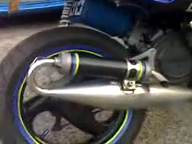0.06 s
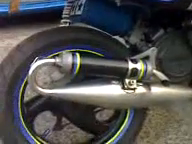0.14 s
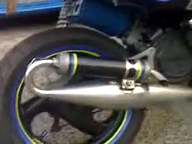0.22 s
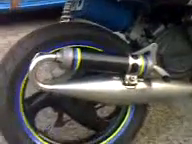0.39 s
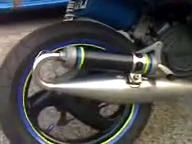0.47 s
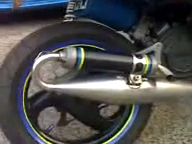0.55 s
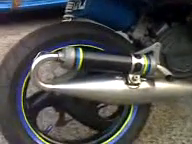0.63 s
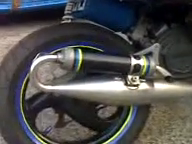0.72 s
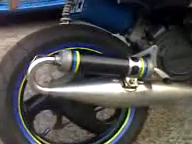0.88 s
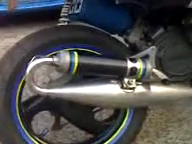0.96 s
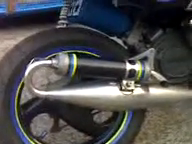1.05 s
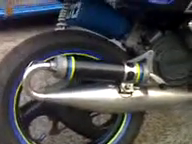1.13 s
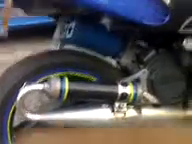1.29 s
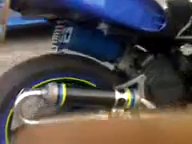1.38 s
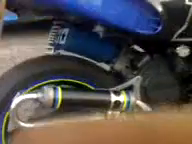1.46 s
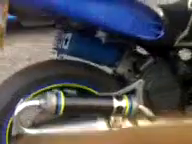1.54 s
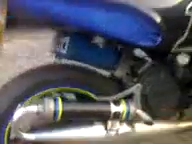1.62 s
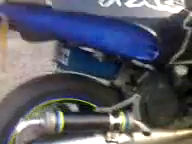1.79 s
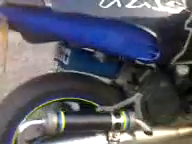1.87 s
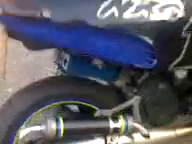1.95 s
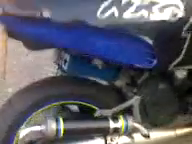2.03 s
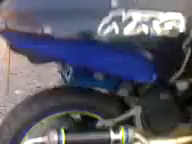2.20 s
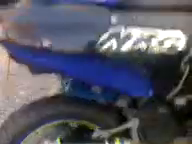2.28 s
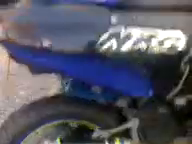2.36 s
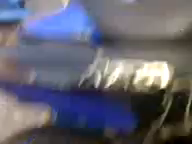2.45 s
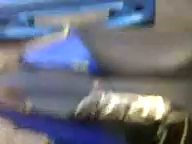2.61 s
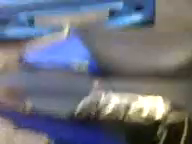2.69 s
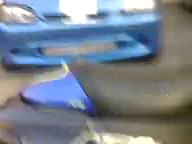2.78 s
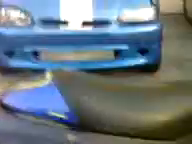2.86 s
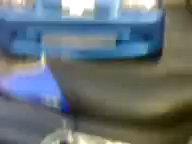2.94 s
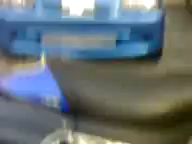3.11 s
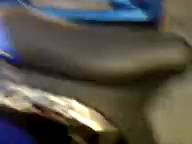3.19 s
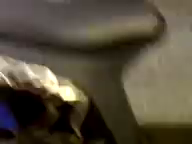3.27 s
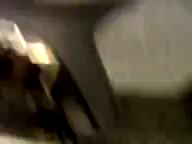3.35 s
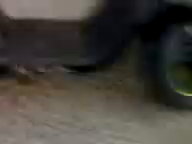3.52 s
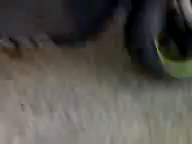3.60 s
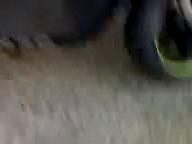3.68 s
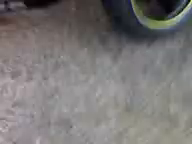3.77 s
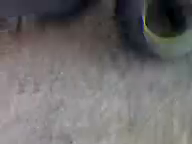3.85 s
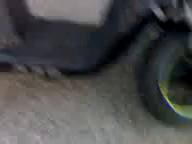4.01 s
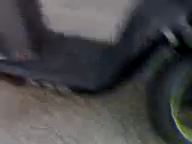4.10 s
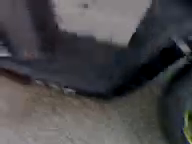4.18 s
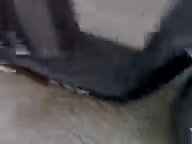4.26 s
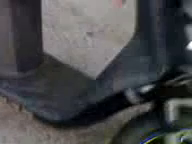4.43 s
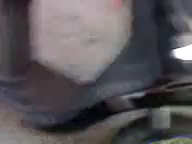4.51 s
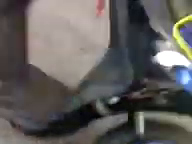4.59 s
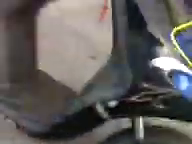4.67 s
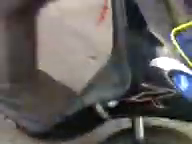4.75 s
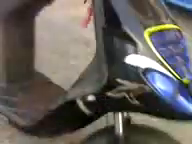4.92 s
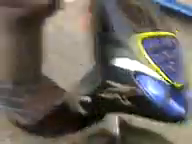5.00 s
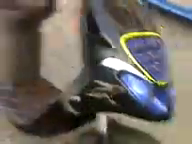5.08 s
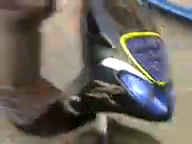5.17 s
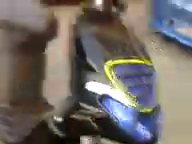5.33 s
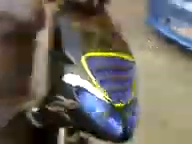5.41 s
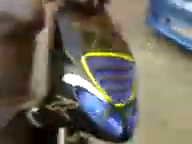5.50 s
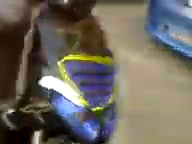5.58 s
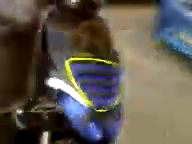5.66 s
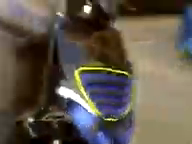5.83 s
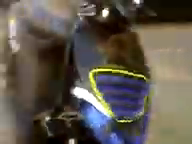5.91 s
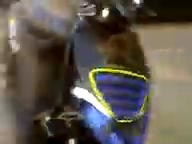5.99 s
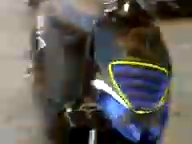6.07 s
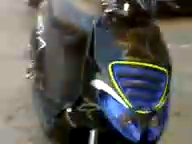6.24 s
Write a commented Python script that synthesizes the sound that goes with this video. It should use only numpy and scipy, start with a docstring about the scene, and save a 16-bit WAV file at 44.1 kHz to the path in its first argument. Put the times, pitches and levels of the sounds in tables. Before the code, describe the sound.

A small two-stroke scooter idles with uneven, hollow exhaust pops and a raspy rattle, growing softer toward the end.

```python
"""In a yard, a small two-stroke scooter idles while the listener walks from its exhaust to the front.
The engine turns about 31 times a second but fires only every third turn, and now and then it stumbles
into weaker, mostly quicker pops. Each pop echoes inside the pipe. Every turn shakes the casing and
chirps at the air intake. A hollow tone glides upward as the body panels pass by, the ground and walls
give a short echo, and three soft, low bumps are heard."""
import sys
import numpy as np
from scipy import signal
from scipy.fft import rfft, irfft, next_fast_len
from scipy.io import wavfile
from scipy.ndimage import uniform_filter1d, map_coordinates

SR = 44100
rng = np.random.default_rng(int(sys.argv[2]) if len(sys.argv) > 2 else 0)


def transcribe(u):
    """Save the signal u as a 16-bit wav file named by the first command-line argument.

    u: samples, shape (n,) or (channels, n), limited to [-1, 1]; the rate is SR.
    q: integer samples, one column per channel.
    """
    v = np.clip(np.atleast_2d(u).T, -1, 1)
    q = np.round(v * 32767).astype(np.int16)
    wavfile.write(sys.argv[1], SR, q)


N = 275625


def amp(db):
    """Turn decibels into a factor to multiply a sound by."""
    return 10 ** (np.asarray(db) / 20)


def unit(x):
    """Scale a signal to an average strength (rms) of 1."""
    return x / np.sqrt(np.mean(x ** 2, axis=-1, keepdims=True) + 1e-20)


def wobble(shape, span):
    """Random wavering: noise averaged over span neighbouring values."""
    return unit(uniform_filter1d(rng.standard_normal(shape), size=span))


def along(points, hz):
    """Read between (frequency, value) points, with octaves evenly spaced."""
    freqs, values = np.transpose(points)
    return np.interp(np.log(hz + 1), np.log(freqs + 1), values)


def curves(rows):
    """Give one value per sample for each column after the time."""
    times, *columns = np.transpose(rows)
    return [np.interp(np.arange(N) / SR, times, column) for column in columns]


def filtered(x, response):
    """Multiply each frequency in x by response(frequency)."""
    size = next_fast_len(N + SR // 2)
    return irfft(rfft(x, size) * response(np.fft.rfftfreq(size, 1 / SR)), size)[:N]


def coloured(x, colour):
    """Shape x with (frequency [Hz], level [dB]) points, then scale it to strength 1."""
    return unit(filtered(x, lambda hz: amp(along(colour, hz))))


def resonate(x, modes):
    """Let x ring at a set of pitches, fading steeply below and above them."""
    def response(f):
        rings = sum((-1) ** k * amp(db) * 1j * f * width / (hz * hz - f * f + 1j * f * width)
                    for k, (hz, width, db) in enumerate(modes))
        below, above = .7 * modes[0][0] / (f + 1), f / (1.3 * modes[-1][0])
        return rings / np.sqrt(1 + below ** 6 + above ** 6)
    return unit(filtered(x, response))


def causal(db):
    """Build a filter with these levels that rings only after a hit (minimum phase)."""
    cepstrum = irfft(np.log(amp(db)))
    half = len(cepstrum) // 2
    return np.exp(rfft(cepstrum * np.r_[1, np.full(half - 1, 2), 1, np.zeros(half - 1)]))


def add(track, s, sound):
    """Mix a sound into the track, starting at s seconds."""
    start = int(np.clip(round(s * SR), 0, N))
    track[start:start + len(sound)] += sound[:N - start]


def spin(start, end, speedup, turn_s):
    """Start times of the whole turns that fill a stretch while the speed grows by a share."""
    count = max(1, round((end - start) / turn_s))
    progress = np.arange(count) / count
    return start + (end - start) * (progress + speedup * progress * (1 - progress) / 2)


def crank(turn_s=.0318, stumble_turn_s=.033, stumble_slows=.07):
    """Time the turns and pops: a steady run fires every third turn, then a stumble slows the engine."""
    # steady runs and their stumbles: (first pop [s], stumble start [s], speed gained [share],
    # weak pop level [dB], weak pop spacing [turns])
    runs = [(0.063, 0.158, 0.055, -2, 2), (0.554, 0.938, 0, -1.5, 2), (1.003, 1.282, 0, -4.5, 2),
            (1.346, 1.922, -.01, -1.5, 2), (2.053, 2.242, .08, -6.5, 2), (2.303, 2.682, 0.061, -3, 2),
            (2.811, 3.194, .01, -2.5, 2), (3.393, 3.966, .08, -3, 2), (4.19, 4.566, 0.06, -.5, 4),
            (4.689, 4.978, -0.046, -5, 2), (5.039, 5.808, .04, -2.5, 2), (5.873, 6.162, .13, -1.5, 3)]
    turns, pops = list(spin(0, runs[0][0], 0, turn_s)), []
    restarts = [run[0] for run in runs[1:]] + [N / SR + turn_s / 2]
    for (first, last, speedup, weak_db, every), restart in zip(runs, restarts):
        steady = spin(first, last, speedup, turn_s)
        stumble = spin(last, restart, -stumble_slows, stumble_turn_s)
        turns += [*steady, *stumble]
        pops += [(s, 0) for s in steady[::3]] + [(s, weak_db) for s in stumble[::every]]
    return np.array(turns), pops


def casing(turns):
    """Piston and transmission shake the casing twice a turn; one thump a turn keeps its hum steady."""
    # noise between the pops: (time [s], low drone [dB], middle churn [dB], high rattle [dB]), all relative
    levels = [(0.0, -30.5, -26.5, -35.5), (0.42, -29, -27.5, -38), (1.2, -30, -27, -38.5),
              (1.92, -31.5, -27.5, -39), (2.31, -32.5, -27, -42), (2.85, -29, -30, -40),
              (3.15, -28.5, -27, -37.5), (3.52, -26.5, -27.5, -44.5), (4.07, -38, -26.5, -41.5),
              (4.67, -31.5, -29, -45.5), (5.01, -34.5, -29, -44.5), (5.85, -34, -34, -46),
              (6.25, -33, -40.5, -51.5)]
    # how casing and panels ring, for drone, churn and hum: (pitch [Hz], width [Hz], level [dB])
    drone_modes = [(164.5, 52, -9.5), (210.4, 37, -9.5), (286.6, 55, -4.5), (327.3, 83, -2.5),
                   (408, 79, -5)]
    churn_modes = [(512.7, 59, 3.5), (680, 240, -6), (780, 120, -4), (1010, 220, -5), (1164, 270, -8),
                   (1320, 140, -8.5)]
    hum_modes = [(198, 11, -2), (283.3, 22, 1.5), (523.3, 44, -7.5)]
    # the hum against the rest of the drone: (time [s], level [dB])
    hum_level = [(0, -0.5), (2, 0), (2.8, -2), (3.7, -5), (5, -3), (5.9, 1.5)]
    # tone colours of the rattle and the deep rumble: (frequency [Hz], level [dB])
    rattle_colour = [(1200, -43.5), (1650, 14), (1900, 1.5), (2300, 1), (2850, -9.5), (3150, -3),
                     (3500, -20), (4300, -20)]
    rumble_colour = [(20, -21), (50, -4), (100, -3), (150, 2.5), (300, -22), (800, -58.5)]
    drone_db, churn_db, rattle_db = curves(levels)
    hum_db, = curves(hum_level)
    angle = 2 * np.pi * np.interp(np.arange(N) / SR, turns, np.arange(len(turns)))

    def shaking(once_db, twice_db, lag):
        """Noise that swells once and twice a turn, lag radians late."""
        swell_db = once_db * np.cos(angle - lag) + twice_db * np.cos(2 * (angle - lag))
        return unit(rng.standard_normal(N) * amp(swell_db))

    thumps = np.zeros(N)
    for s in turns:
        add(thumps, s + .004, np.ones(1))
    hum = amp(hum_db) * resonate(unit(thumps), hum_modes)
    drone = resonate(shaking(once_db=2.5, twice_db=8, lag=1.2), drone_modes)
    churn = resonate(shaking(once_db=-2, twice_db=1, lag=3.6), churn_modes)
    grain = amp(2.5 * wobble(N, span=130))
    rattle = coloured(grain * shaking(once_db=-3, twice_db=-1, lag=1.6), rattle_colour)
    rumble = coloured(rng.standard_normal(N), rumble_colour)
    return (amp(drone_db - 2) * (drone + hum) + amp(churn_db - 1) * churn
            + amp(rattle_db + 4) * rattle + amp((drone_db + rattle_db) / 2 - 10.5) * rumble)


def intake_chirps(turns, pitch_hz=1644, swell_s=.0049, fall_s=.0042, lag_s=.0105, glide=-.018, size=1400):
    """A shrill, raspy chirp each turn, likely from the intake's reed (a thin flap) fluttering."""
    # the usual chirp: (time [s], relative level [dB])
    chirp_level = [(0, -21), (0.301, -16.5), (.75, -19), (2.3, -20), (3, -23.5), (3.25, -19), (3.75, -21.5),
                   (4.05, -30), (5.25, -29), (5.75, -35.5), (6.0, -24.5)]
    # turns that chirp much louder: (time [s], relative level [dB], pitch [Hz])
    loud_chirps = [(0.166, -14.5, 1629), (0.197, -8.5, 1636), (0.263, -10.5, 1636), (0.884, -8, 1634),
                   (0.915, -9, 1650), (1.513, -12, 1565), (1.841, -11.5, 1688), (2.061, -12.5, 1675),
                   (2.252, -11.5, 1625), (2.473, -10.5, 1607), (3.267, -12.5, 1630), (3.879, -19, 1720),
                   (4.136, -17, 1707), (4.673, -21, 1627), (5.213, -17, 1606), (6.083, -19.5, 1675),
                   (6.176, -20.5, 1652)]
    # the airy edge of a chirp: (frequency [Hz], level [dB])
    rasp_colour = [(300, -29.5), (700, 5), (1100, -14), (1400, -5), (1600, 8), (1850, -6), (2300, -18.5),
                   (2800, -15), (3200, -18), (3600, -33), (4300, -44)]
    count = len(turns)
    times = turns + lag_s + .0005 * rng.standard_normal(count)
    levels = np.interp(times, *np.transpose(chirp_level)) + 3.5 * np.minimum(rng.standard_normal(count), 1)
    drift = .011 * wobble(count, span=6)
    pitches = pitch_hz * (1 + drift + .008 * rng.standard_normal(count))
    for s, db, hz in loud_chirps:
        nearest = np.argmin(np.abs(times - s))
        times[nearest], levels[nearest], pitches[nearest] = s, db, hz
    t = (np.arange(size) - size // 2) / SR
    rebound = .18 * np.exp(-((t - .007) / .003) ** 2)
    swell = np.exp(-(t / np.where(t < 0, swell_s, fall_s)) ** 2) + rebound
    tone, air = np.zeros(N), np.zeros(N)
    for s, db, hz in zip(times, levels, pitches):
        flutter, waver = .25 * wobble((2, size), span=90)
        cycles = np.cumsum(hz * (1 + glide * t / swell_s)) / SR + rng.random()
        add(tone, s + t[0], amp(db + 2) * swell * (1 + flutter) * np.sin(2 * np.pi * cycles + waver))
        add(air, s + t[0], amp(db - 7) * swell)
    return tone + air * coloured(rng.standard_normal(N), rasp_colour)


def firings(pops, scatter_db=.5, treble_scatter_db=2):
    """Give each pop its time, level and treble; no two firings are quite alike."""
    # the exhaust as heard along the walk: (time [s], level [dB], treble [dB])
    pop_level = [(0, -17, 3), (1.1, -16.5, -0.5), (1.9, -16.5, 2), (2.4, -16.5, -2), (2.8, -19.5, 5),
                 (3.12, -22, 4.5), (3.45, -17, -4.5), (3.7, -15, -3), (4.4, -17.5, -1), (5.1, -21.5, -5),
                 (5.7, -24, 3), (6.16, -29, 5.5)]
    # the hardest firings: (time [s], extra level [dB], extra treble [dB])
    hard_pops = [(.064, 1.5, -0.5), (.747, 1, 3), (1.097, 2, 1), (1.189, 2, 2.5), (2.052, 1.3, 1)]
    times, strength_db = np.transpose(pops)
    walk_s, walk_db, walk_treble_db = np.transpose(pop_level)
    chance = rng.standard_normal((len(times), 2))
    db = np.interp(times, walk_s, walk_db) + strength_db + scatter_db * chance[:, 0]
    treble_db = np.interp(times, walk_s, walk_treble_db) + treble_scatter_db * chance[:, 1]
    for s, extra_db, extra_treble_db in hard_pops:
        nearest = np.argmin(np.abs(times - s))
        db[nearest] += extra_db
        treble_db[nearest] += extra_treble_db
    return zip(times, db, treble_db)


def exhaust(pops, gas=.14, gas_s=.0078, thinning_db=4, detour=.061, size=4096):
    """Each firing sends a pressure pulse, its echoes in the pipe and a puff of gas out of the silencer."""
    # the walk round the scooter: (time [s], place [0 rear, 1 side, 2 or more front])
    walk = [(0, 0.27), (2.6, 0.52), (3.3, 0.93), (3.9, 1.25), (4.5, 1.57), (5.5, 2.3)]
    # pressure waves leaving the pipe: (base delay [s], rear [gain], side [gain], front [gain])
    pipe_waves = [(.0005, 0.93, 1.5, 0.97), (.0028, 0.63, 0.64, 0.83), (.0049, 0.29, 0.45, 0.88),
                  (.0073, 0.99, 0.39, 0.17), (.0098, 0.97, 0.37, 0.43), (.0121, 0.19, 0.29, 0.19),
                  (.0155, .08, 0.13, 0.43)]
    # a pop's tone colour from behind, beside and in front: (frequency [Hz], level [dB])
    rear = [(60, -23.5), (130, -18.5), (210, -5.5), (420, -17), (680, -5.5), (850, 1.5), (1100, -19.5),
            (1250, -7.5), (1450, -6.5), (1900, -24.5), (2170, -10), (2600, -26), (3200, -31), (4300, -51.5)]
    side = [(60, -27.5), (130, -19), (210, -16.5), (420, -15), (680, 3), (830, -6.5), (1000, -1),
            (1200, -22.5), (1420, -11), (1700, -7.5), (2170, -22.5), (2600, -32), (3200, -35),
            (4300, -60.5)]
    front = [(60, -28.5), (130, -17), (210, -6.5), (420, -22.5), (680, -3.5), (850, -2), (1100, 3.5),
             (1300, -16.5), (1550, -7.5), (1900, -21.5), (2170, -15), (2600, -28), (3200, -33.5),
             (4300, -66.5)]
    # tone colour of the swirling gas: (frequency [Hz], level [dB])
    gas_colour = [(800, -5), (1300, -2.5), (2000, -0.5)]
    out, t, hz = np.zeros(N), np.arange(size) / SR, np.fft.rfftfreq(size, 1 / SR)
    delays, *gains = np.transpose(pipe_waves)
    colours = np.array([along(points, hz) for points in (rear, side, front)])
    # later echoes sound thinner: they have lost more bass through the open tailpipe
    thinning = amp(thinning_db * delays[:, None] / delays[-1] * along([(500, .16), (1200, 1)], hz))
    puff_shape = t / gas_s * np.exp(1 - t / gas_s) * np.exp(-(t / .018) ** 2)
    middle = (hz > 550) & (hz < 1300)
    for s, db, treble_db in firings(pops):
        place = np.clip(np.interp(s, *np.transpose(walk)), 0, 2)
        facing = np.maximum(0, 1 - np.abs(place - np.arange(3)))
        colour = facing @ colours + treble_db * along([(1100, 0), (2100, 1)], hz)
        # gas heat shifts the echoes a little from pop to pop, and their paths change along the walk
        jitter = .007 * rng.standard_normal() + .008 * rng.standard_normal(len(delays))
        arrivals = delays * (1 + jitter + detour * min(place, 1))
        strengths = facing @ np.array(gains) * amp(1.2 * rng.standard_normal(len(delays)))
        pulses = strengths @ (thinning * np.exp(-2j * np.pi * arrivals[:, None] * hz))
        puff = rfft(gas * rng.standard_normal(size) * puff_shape) * amp(along(gas_colour, hz))
        pop = (pulses + puff) * causal(colour)
        # the level is set by the pop's middle frequencies over a fiftieth of a second
        power = 2 * np.sum(np.abs(pop[middle]) ** 2) / size / (SR / 50)
        add(out, s, amp(db) * irfft(pop) / np.sqrt(power))
    return out


def panel_echoes(x, depth):
    """Quick echoes off nearby panels, each flipped in sign, add a hollow tone that moves with the walk."""
    # the hollow tone: (time [s], lowest ringing pitch [Hz], relative echo strength [0-1])
    hollow_tone = [(0, 212, 0.3), (1.2, 215.8, 0.49), (1.9, 187.3, 0), (2.5, 311.5, 0.5), (3, 358.5, .55),
                   (3.3, 455, 0.4), (3.55, 524, 0.56), (3.9, 610, .35), (4.2, 756, 0.2), (4.6, 1063, 0.1),
                   (5.4, 988, 0.07), (6.25, 1240, 0)]
    hz, reflection = curves(hollow_tone)
    gain = np.clip(depth * reflection, 0, .8)
    lag = SR / (2 * hz)
    echoes = sum((-gain) ** k * map_coordinates(x, [np.arange(N) - k * lag], order=1) for k in range(4))
    return echoes * np.sqrt(1 - gain * gain)


def yard_echo(x, shift_hz=.773):
    """Ground and walls give a short, blurred echo whose pattern shifts as the listener moves."""
    # how long the yard rings: (frequency [Hz], time to fade by 60 dB [s])
    fade_times = [(200, 0.28), (1000, 0.1), (4000, 0.19)]
    hz, t, noise = signal.stft(rng.standard_normal((2, SR // 3)), SR, nperseg=256)
    fade = amp(-60 * t / along(fade_times, hz)[:, None])
    _, tails = signal.istft(noise * fade, SR, nperseg=256)
    tails = [np.pad(tail, (SR // 100, 0)) / np.linalg.norm(tail) for tail in tails]
    angle = 2 * np.pi * shift_hz * np.arange(N) / SR
    blends = np.cos(angle), np.sin(angle)
    return sum(signal.fftconvolve(x * blend, tail)[:N] for blend, tail in zip(blends, tails))


def soft_bumps(width_s=.0051, size=4410):
    """Each bump is a short, dull swell of a few waves."""
    # low bumps: (time [s], peak level [dB], pitch [Hz])
    bumps = [(.585, -17, 297), (0.609, -17.5, 217.5), (4.235, -23, 200)]
    out, t = np.zeros(N), (np.arange(size) - size // 2) / SR
    swell = np.exp(-(t / width_s) ** 2)
    for s, db, hz in bumps:
        add(out, s + t[0], amp(db) * swell * np.sin(2 * np.pi * (hz * t + rng.random())))
    return out


def scene():
    """Mix exhaust, intake and casing, all timed by the crank, with the yard's echo and the bumps."""
    turns, pops = crank()
    engine = panel_echoes(exhaust(pops), depth=.33) + intake_chirps(turns)
    echo = amp(-11) * yard_echo(engine)
    body = panel_echoes(casing(turns), depth=1.1)
    return (engine + echo + body + soft_bumps())[None]


def record(dry, top_hz=15850):
    """A dull, telephone-like sound with little treble; the tallest peaks are cut off with a faint tick."""
    # the frequencies that are heard: (frequency [Hz], level [dB])
    band = [(20, -18), (45, -1), (3500, -1), (4000, -10.5), (4300, -18), (4600, -58)]
    rounded = dry[0] / (1 + np.abs(dry[0] / .9) ** 6) ** (1 / 6)
    dull = filtered(rounded, lambda hz: amp(along(band, hz)))
    clipped = np.clip(dull, -.7, .7)
    return filtered(clipped, lambda hz: hz < top_hz)[None]


dry = scene()
out = record(dry)
transcribe(out)
```